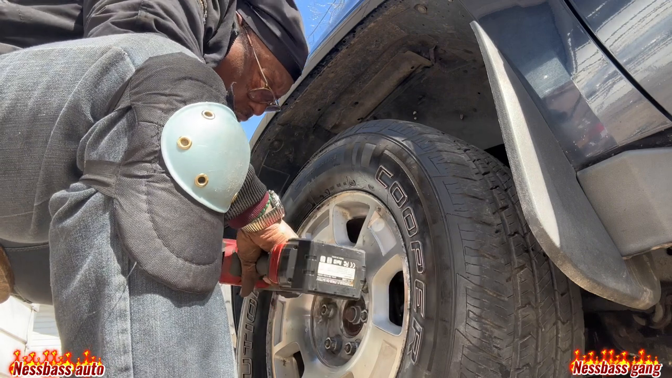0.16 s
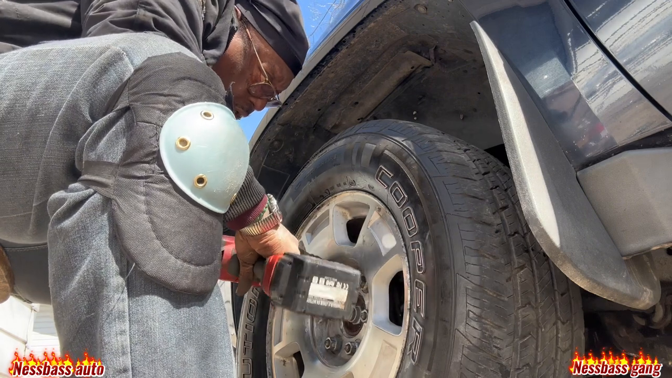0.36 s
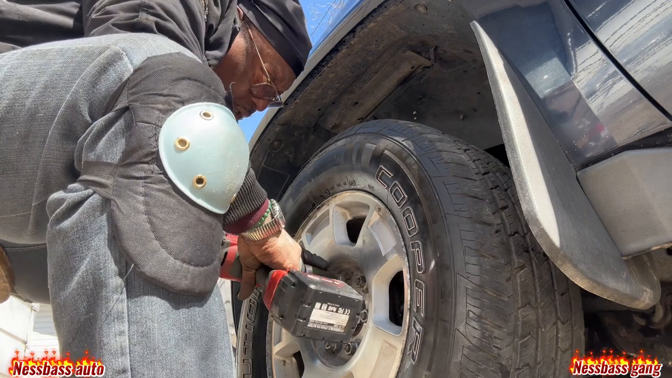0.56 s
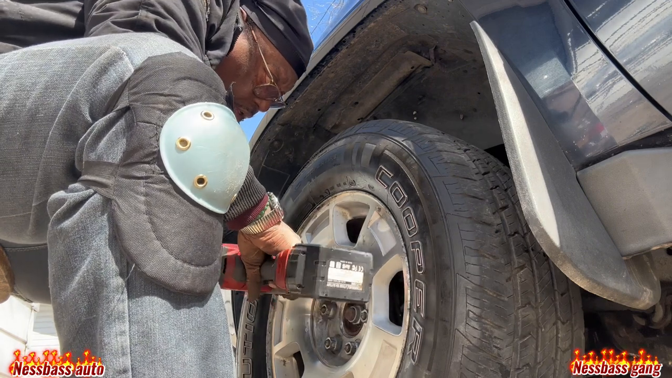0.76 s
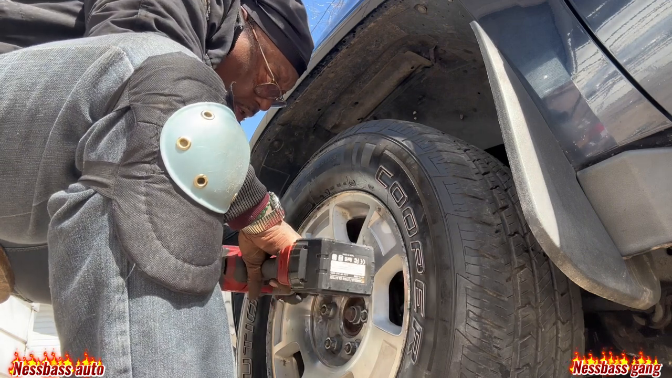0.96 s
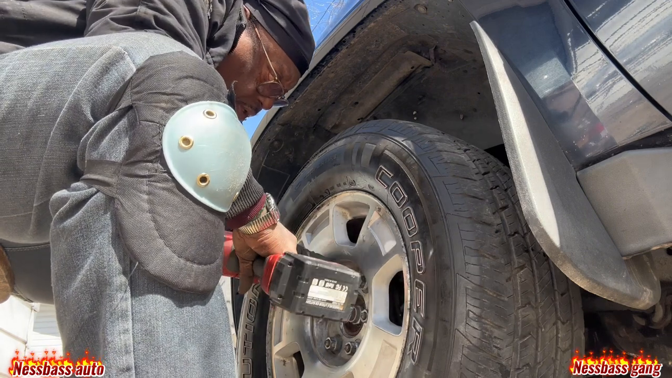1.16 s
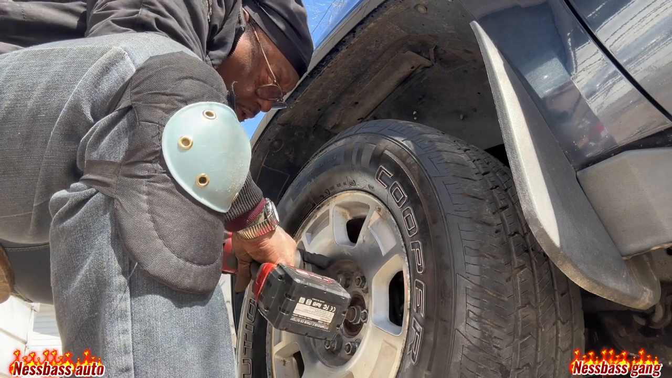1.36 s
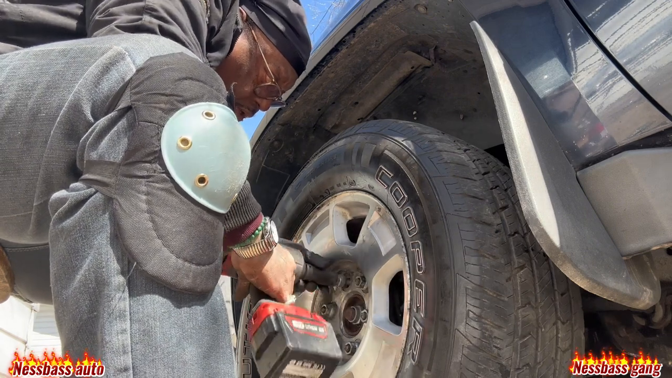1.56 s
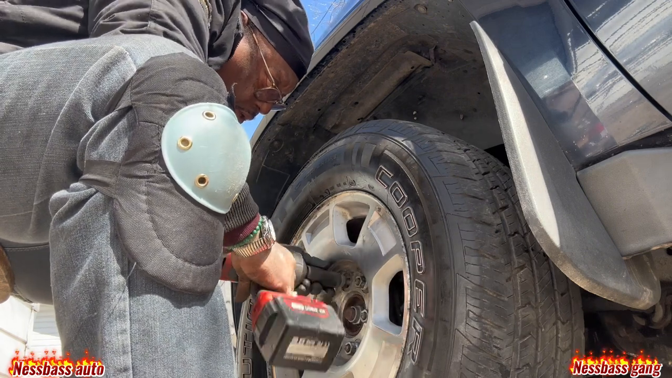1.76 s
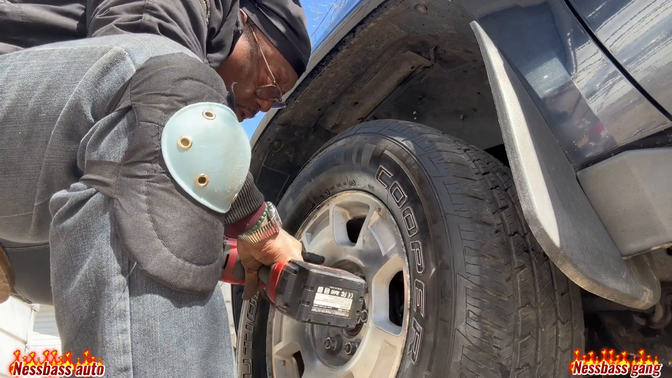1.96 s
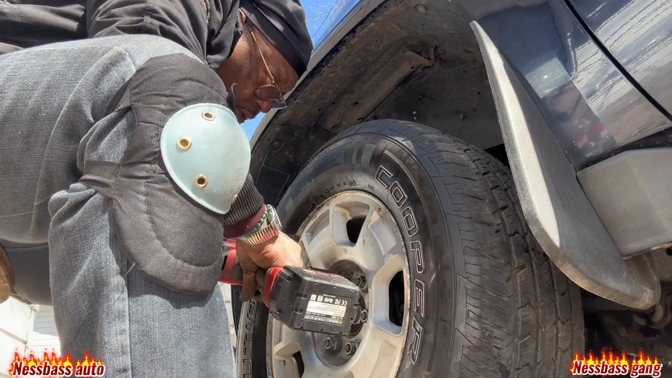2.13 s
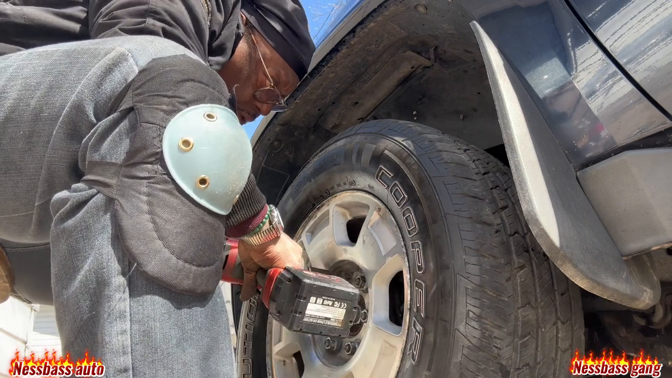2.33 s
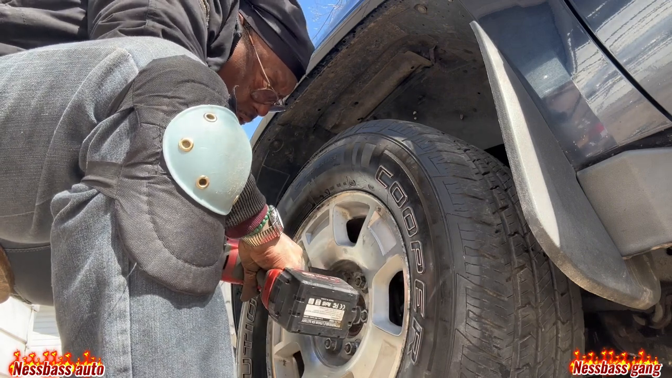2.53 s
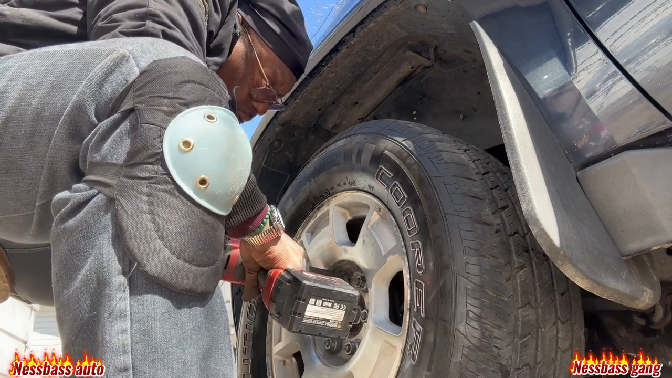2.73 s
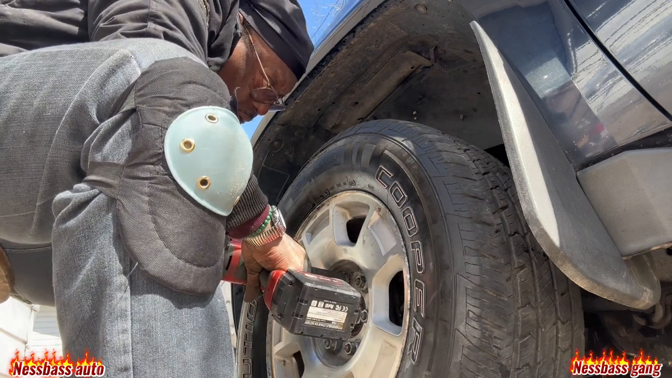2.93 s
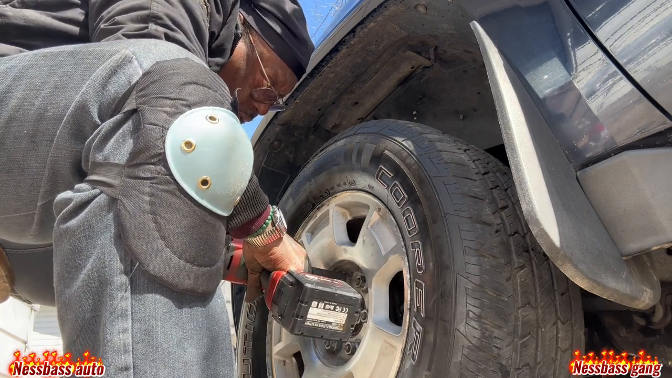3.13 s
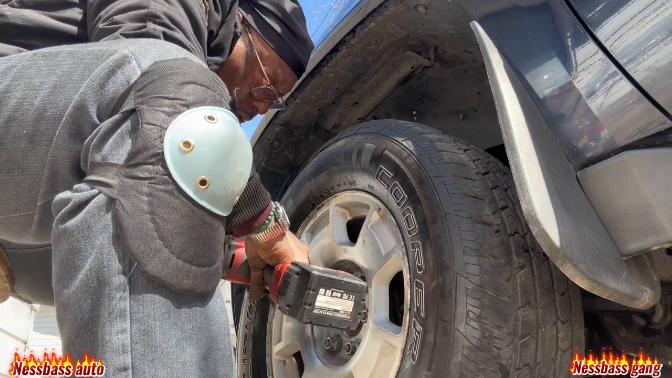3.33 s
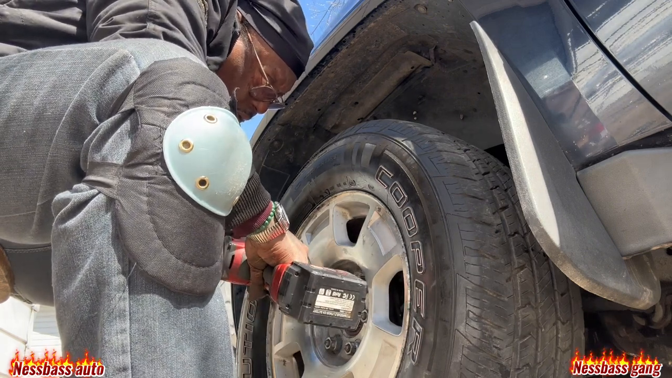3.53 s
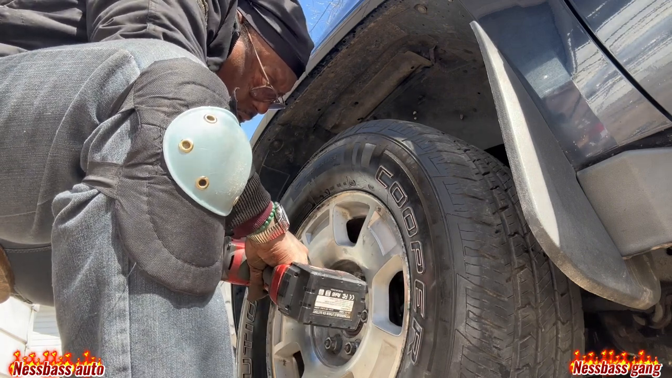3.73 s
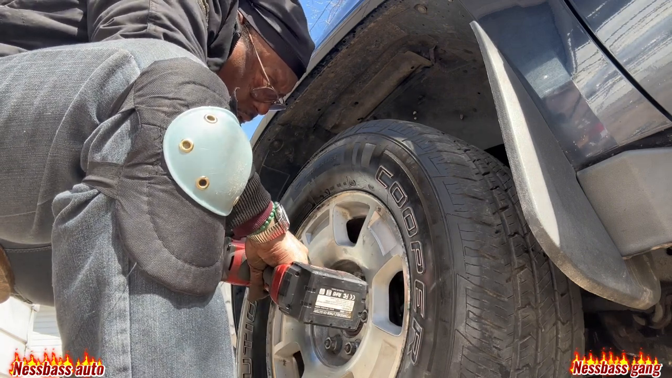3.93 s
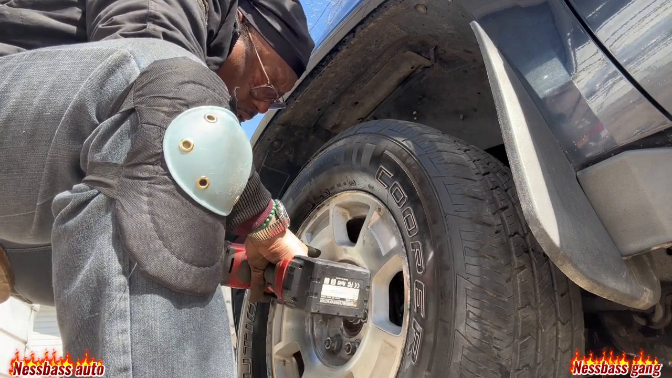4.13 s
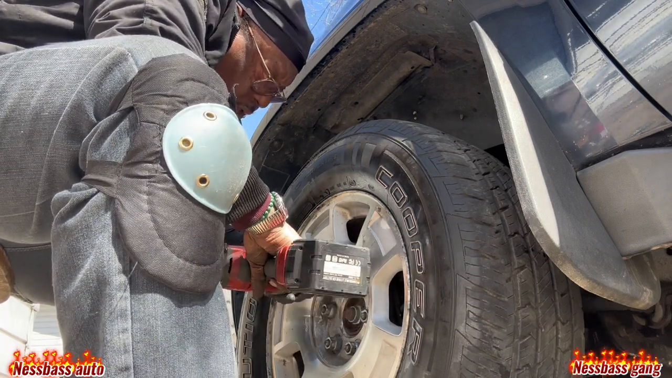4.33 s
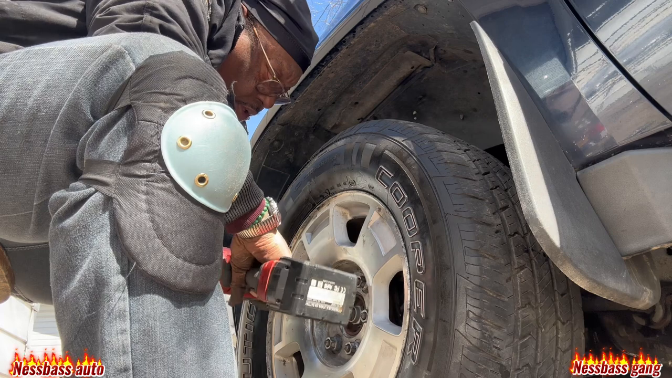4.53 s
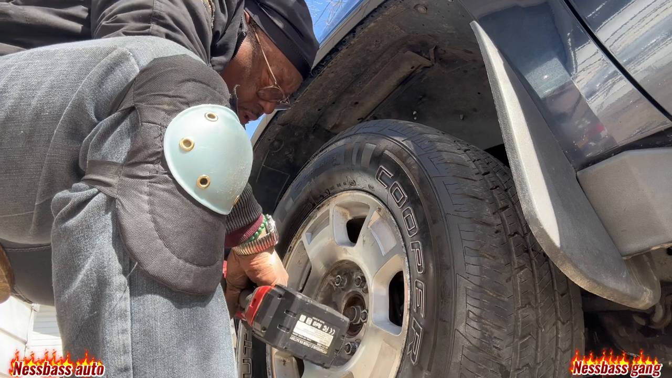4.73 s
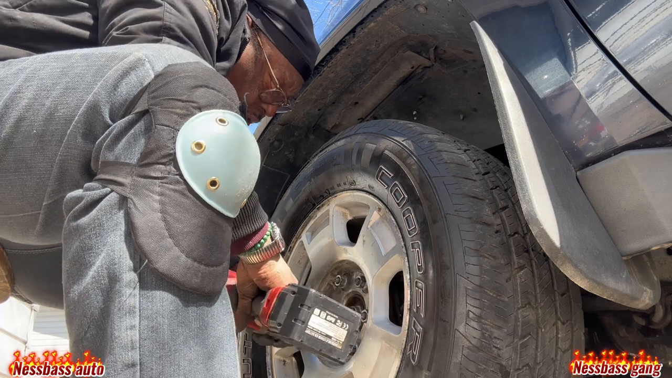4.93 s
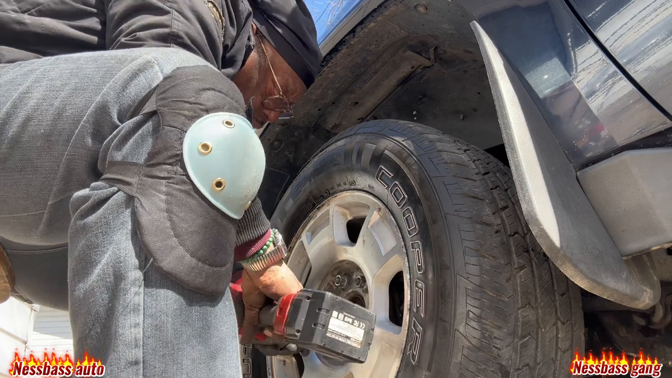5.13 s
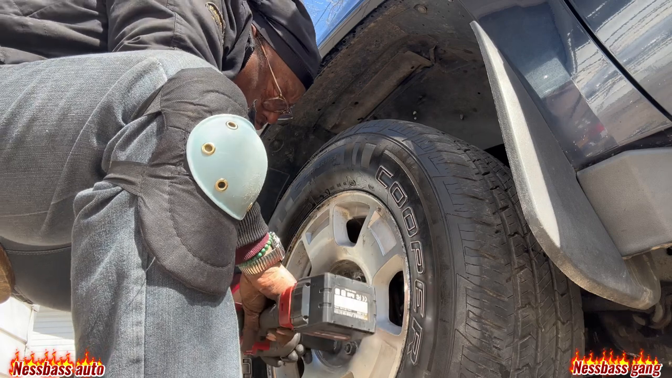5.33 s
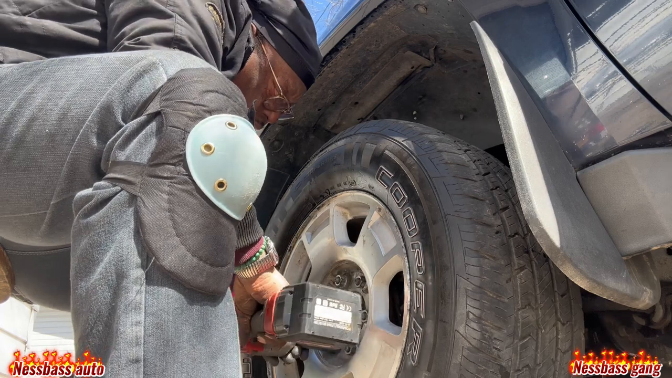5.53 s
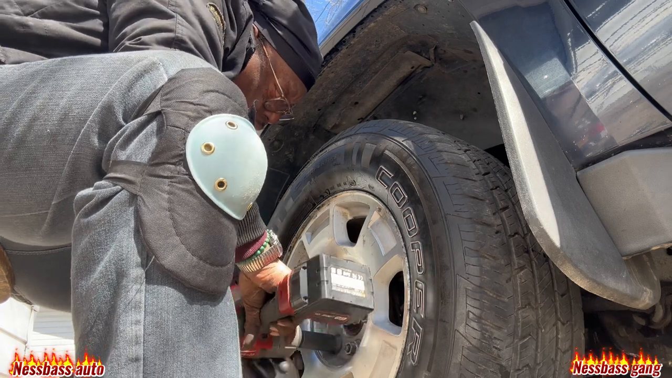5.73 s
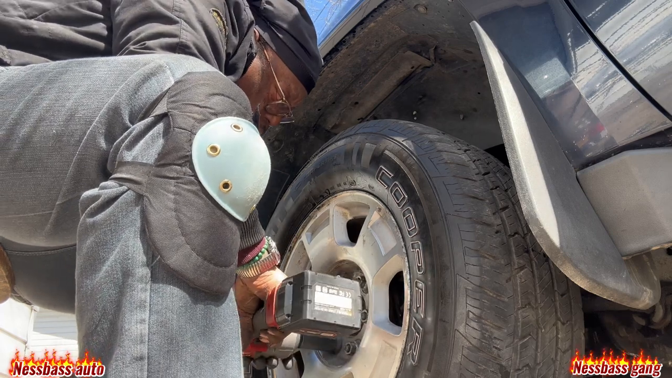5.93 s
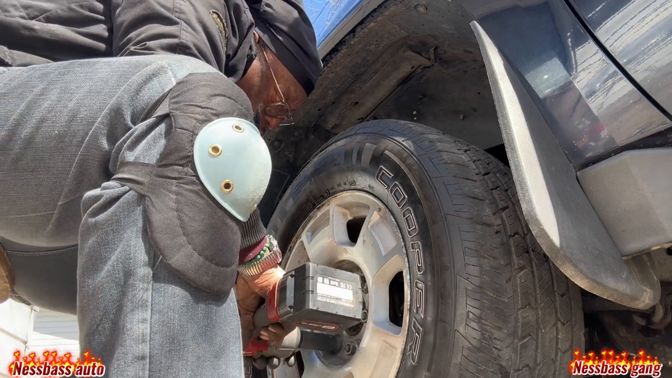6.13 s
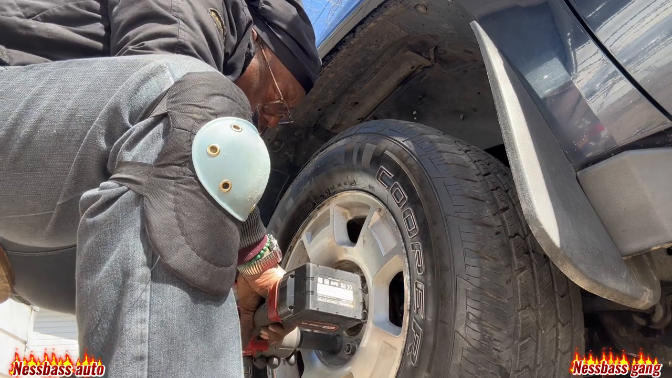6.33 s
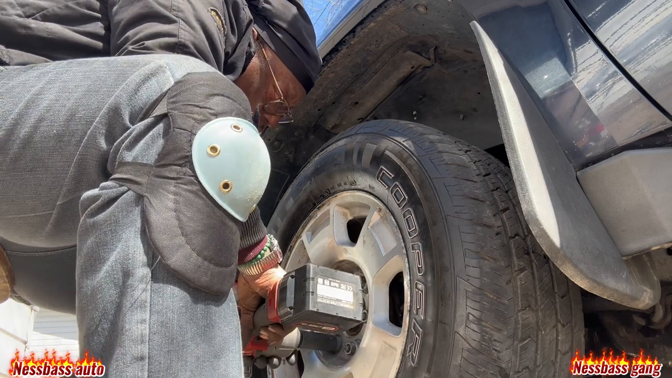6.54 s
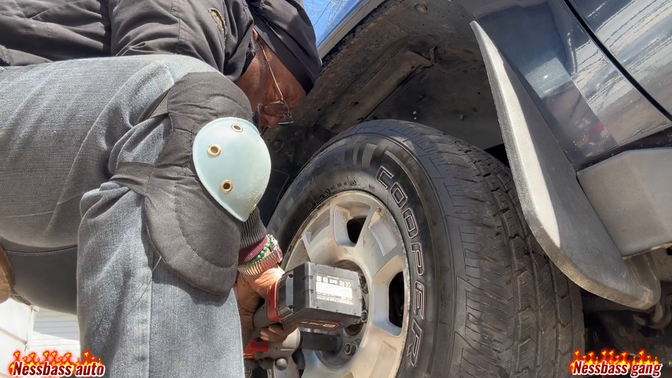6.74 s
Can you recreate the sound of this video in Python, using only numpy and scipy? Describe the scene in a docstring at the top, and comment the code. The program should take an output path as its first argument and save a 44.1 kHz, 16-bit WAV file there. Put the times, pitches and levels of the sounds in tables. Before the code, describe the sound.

A cordless impact wrench whirs up and hammers wheel nuts in two loud rattling bursts, with light socket knocks between, outdoors in faint wind.

```python
"""A cordless impact wrench works two wheel nuts on a driveway, an arm's length from a phone on the ground.
Its hammer strikes the anvil and rebounds: noise bursts excite ringing modes of socket, wheel and tyre.
The drive electronics whine as sines around their switching tone; gears whirr as shaped noise.
Between bursts the socket knocks on the studs, under noise shaped as wind, far traffic and rustling cloth."""
import sys
import numpy as np
from scipy import signal
from scipy.fft import rfft, irfft, next_fast_len
from scipy.io import wavfile
from scipy.ndimage import uniform_filter1d

SR = 44100
rng = np.random.default_rng(int(sys.argv[2]) if len(sys.argv) > 2 else 0)


def unload_audio(sound):
    """Save the sound as a 16-bit wav file, at the path given as the first command line argument."""
    columns = np.transpose(np.atleast_2d(sound))
    # keep every value between -1 and 1, then stretch to whole-number steps
    steps = np.round(np.clip(columns, -1, 1) * 32767)
    wavfile.write(sys.argv[1], SR, steps.astype(np.int16))


N = 299439
T = np.arange(N) / SR
SIZE = next_fast_len(N + SR // 8)  # padded transform length
HZ = np.maximum(np.arange(SIZE // 2 + 1) * SR / SIZE, 1)  # frequency of each bin


def undb(db):
    """Decibels to gain."""
    return np.exp(np.asarray(db) * np.log(10) / 20)


def over_hz(table):
    """A (frequency, value) table read at every bin, straight between points on a log-frequency axis."""
    hz, value = np.transpose(table)
    return np.interp(np.log(HZ), np.log(hz), value)


def shape(x, gain):
    """Filter with one gain a bin; white noise keeps its power, so only the shape of the gain counts."""
    gain_rms = np.sqrt(np.mean(np.abs(gain) ** 2))
    return irfft(rfft(x, SIZE) * gain / gain_rms, SIZE)[..., :N]


def hiss():
    """Two unrelated white noises."""
    return rng.standard_normal((2, N))


def walk(rate):
    """Random levels held 1 / rate seconds and smoothed twice into a slow wander."""
    hold = int(SR / rate)
    steps = np.repeat(rng.standard_normal(N // hold + 1), hold)
    return uniform_filter1d(uniform_filter1d(steps, hold), hold)[:N]


def ring(x, hz, db, t60):
    """One decaying mode: a two-pole resonator that falls 60 dB in t60 seconds."""
    radius = 1000. ** (-1 / (t60 * SR))
    angle = 2 * np.pi * hz / SR
    return undb(db) * signal.lfilter([0, np.sin(angle)], [1, -2 * radius * np.cos(angle), radius ** 2], x)


def push(s, db, rise, fall):
    """Contact envelopes at times s: power rises and falls with the two time constants, peak near db."""
    power = np.zeros(N)
    np.add.at(power, (s * SR).astype(int), undb(2 * db))
    for tau in (rise, fall):
        power = signal.lfilter([1], [1, -np.exp(-1 / (tau * SR))], power)
    return np.sqrt(power / (min(rise, fall) * SR))


def taps(s, db):
    """One impulse at each time s, in the part that both ports share."""
    out = np.zeros((2, N))
    inside = s < T[-1]
    out[0, (s[inside] * SR).astype(int)] = undb(db[inside])
    return out


def well_separated(s, apart_s):
    """True for hits more than apart_s after the last one marked true."""
    separate, last = np.zeros(len(s), bool), -1
    for i, t in enumerate(s):
        if t - last > apart_s:
            separate[i], last = True, t
    return separate


def blows():
    """The hammer strikes, rebounds once a stroke, and drive slack clacks: rows of strikes() in time order."""
    # hammer strokes: start_s, crack_db, wheel_ring_db above the crack, rebound_after_s, rebound_crack_db
    strokes = [(3.1811, -12.5, 3, 0.016, -16), (3.2465, -10.5, -4, .0208, -15),
               (3.3155, -7.5, -6.5, .0219, -14.5), (3.3863, -8.5, -6, .019, -12.5),
               (3.4521, -10, -4, .0202, -11.5), (3.521, -10, -3.5, .0209, -12),
               (3.5886, -8, -6, .0216, -10.5), (3.6566, -12.5, -11, .0208, -11.5),
               (3.7255, -10.5, -6, 0.025, -15), (3.7922, -12, -3.5, .0193, -12),
               (3.86, -10, 0, .0192, -14.5), (3.9308, -10, -4, 0.013, -14), (3.9978, -10, 0, .0162, -17.5),
               (4.0634, -12, -0.5, .0166, -13), (4.1326, -14, -3.5, .015, -12.5),
               (4.2004, -13, -16, .0199, -11.5), (6.0567, -12.5, 0.5, .021, -12),
               (6.1297, -13, 5, .0186, -18), (6.1972, -11, -3, .0173, -17.5),
               (6.2631, -13, -3.5, .0187, -13), (6.332, -13.5, -6, .0187, -14.5),
               (6.4006, -14, -5, .0163, -13.5), (6.4668, -12.5, 1, .0199, -15),
               (6.5358, -12.5, -6, .0146, -12.5), (6.6011, -13, -4, .0162, -10.5),
               (6.6699, -13, -2, .0148, -14), (6.7356, -12.5, -13, .0172, -9.5)]
    # slack clacks as it takes up and between strokes while the nut still turns:
    # start_s, crack_db, treble_db above the crack
    clacks = [(2.145, -33, -5), (2.2018, -14.5, -31.5), (3.173, -16.5, -7), (3.225, -13.5, -13.5),
              (3.2934, -16.5, -10.5), (3.356, -16.5, -8.5), (3.368, -12, -10.5), (3.4296, -18.5, -2),
              (3.501, -17, -5.5), (3.6365, -21.5, -1.5), (3.77, -20, -10.5), (6.0483, -13.5, -10),
              (6.1054, -20, -11)]
    s, db, wheel_db, after, rebound_db = np.transpose(strokes)
    # treble above the crack, scattered from hit to hit
    scatter_db = 3.5 * rng.standard_normal((2, len(s)))
    struck = np.transpose([s, db, wheel_db, -8 + scatter_db[0]])
    rebounds = np.transpose([s + after, rebound_db, wheel_db + 0.5, -14 + scatter_db[1]])
    slack = [(t, crack_db, -9.5, treble_db) for t, crack_db, treble_db in clacks]
    rows = np.concatenate([struck, rebounds, slack])
    return rows[np.argsort(rows[:, 0])]


def strikes(rows, split_hz, fall, wash, tail_db, dull, thump_db, windup_db, late):
    """Steel on steel: tick and rattling crack, wheel-arch wash, wheel and tyre; also the bare low contact.

    Row columns: start_s, crack_db, wheel_ring_db and treble_db, the last two above the crack.
    """
    # overall crack spectrum as heard: frequency_hz, relative_db
    crack_spectrum = [(180, -36.5), (300, -15), (640, -10), (797, -4), (912, -13.5), (1080, -11.5),
                      (1410, -17.5), (2630, -10), (6650, -14.5), (7610, -17.5), (9160, -17), (10300, -24.5),
                      (11800, -22.5), (15700, -26.5), (16800, -53.5)]
    s, crack_db, wheel_db, treble_db = np.transpose(rows)
    separate = well_separated(s, apart_s=.055)
    upper = 1 / (1 + (split_hz / HZ) ** 8)
    spectrum = undb(over_hz(crack_spectrum))

    # a tick, then loose parts chatter, so the crack is a cluster of tiny contacts
    chatter = undb(4 * walk(1000))
    low_tick = push(s, crack_db - 8.5, 0.0002, 0.00064)
    low_rattle = chatter * push(s - .001, crack_db - 8.0, 0.0027, fall)
    low = (low_tick + low_rattle) * hiss()
    high_db = crack_db + treble_db
    high_tick = push(s, high_db + 3.5, 0.00023, .0008)
    high_rattle = chatter * push(s - .001, high_db - 3.5, 0.0027, 0.73 * fall)
    high = (high_tick + high_rattle) * hiss()
    crack = shape(low, spectrum * (1 - upper)) + shape(high, spectrum * upper)

    # the cam grinds as it lifts the hammer ahead of a hit
    windup = push(s[separate] - .016, crack_db[separate] + windup_db, .006, 0.0045)
    windup = windup + push(s - .004, crack_db + windup_db + 7.0, 0.0027, 0.003)
    arch_level = push(s, crack_db + tail_db, 0.0024, wash) + windup
    arch = shape(arch_level * hiss(), spectrum * (1 + (HZ / 1500) ** 2) ** (-dull / 2))
    # a fainter, duller and longer tail
    yard = shape(push(s + .01, crack_db - 37, .01, 0.049) * hiss(), spectrum / (1 + (HZ / 4000) ** 2))

    ringing = wheel_ring(s, crack_db + wheel_db, separate)
    thud = tyre(s[separate], crack_db[separate] + thump_db, late)
    return crack + arch + yard + ringing + thud, low


def wheel_ring(s, db, separate):
    """The wheel is struck and, after well separated hits, rocks back on the hub; blow and shake ring it."""
    # wheel modes: frequency_hz, relative_db, t60_s
    wheel_modes = [(330, -9, 0.081), (526.4, -2, 0.084), (586, -1, 0.049), (693, 1.5, 0.085),
                   (816, 6, 0.053), (965, -0.5, 0.029), (1085.6, -3, 0.12)]
    shake = push(s + 0.0027, db - 33.5, 0.00078, 0.0022)
    shake = shake + push(s[separate] + 0.013, db[separate] - 30.0, 0.0023, 0.0023)
    blow = uniform_filter1d(taps(s + 0.00217, db - 15.0), size=9)
    return sum(ring(blow + shake * hiss(), *mode) for mode in wheel_modes)


def tyre(s, db, late):
    """Tyre and suspension: low modes swell and fade, the same way after each well separated hit."""
    # tyre modes: frequency_hz, relative_db, swell_s, delay_s before the factor late
    tyre_modes = [(99.5, 0, 0.0086, .047), (97, -12.5, 0.0069, .008), (150.4, -5, 0.0095, .009),
                  (265, -5.5, 0.0061, 0.0048), (254.8, -0.5, .009, 0.0184)]
    out = 0
    for hz, mode_db, swell, delay in tyre_modes:
        t60 = swell * np.log(1000)
        once = ring(taps(s + late * delay, db), hz, mode_db, t60)
        # the same resonance twice in a row swells before it fades
        out = out + ring(once, hz, 0, t60) * 2 * np.e / (swell * SR)
    return out


def tool_ring(contact):
    """The hammer rings anvil and socket; strokes land differently, so the anvil's modes change balance."""
    # short anvil modes: frequency_hz, relative_db, t60_s
    anvil_modes = [(2037, -29, 0.023), (2810, -30, 0.021), (3430, -29.5, 0.016), (3900, -26.5, 0.0068),
                   (4720, -20.5, 0.0065), (5400, -21.5, 0.0082), (5850, -24.5, 0.0094), (7470, -22, 0.0081)]
    # longer socket modes: frequency_hz, relative_db, t60_s
    socket_modes = [(1700, -53, .2), (2557, -50, .2), (3020, -49, .36), (3356, -50, .25), (3451, -53, .3),
                    (3521, -51, .4), (3549, -54, .35), (4237, -53, .3), (4420, -55, .3), (4554, -55, .4)]
    anvil = sum(ring(contact * undb(4 * walk(30)), *mode) for mode in anvil_modes)
    return anvil + sum(ring(contact, *mode) for mode in socket_modes)


def hammering():
    """The wrench's blows on wheel and tyre, with the ring of the tool itself."""
    hammer, contact = strikes(blows(), split_hz=5500, fall=0.0035, wash=0.014, tail_db=-14.0, dull=0.5,
                              thump_db=-14.5, windup_db=-21.5, late=0.931)
    return hammer + tool_ring(contact)


def past(s, switch_s=0.029):
    """A ramp from 0 at time s to 1 switch_s later."""
    return np.clip((T - s) / switch_s, 0, 1)


def trigger():
    """Field speed and the gains of whine and whirr: spin up, run free, labour under the hammer, brake."""
    # trigger pulls: pulled_s, hammering_from_s, released_s, then gains while hammering: whine_db, whirr_db
    pulls = [(2.114, 3.169, 4.24, -11.5, -35), (5.968, 6.041, 6.9, -8, -41)]
    free_hz, loaded_hz, brake_s = 411.2, 400, .05  # field rotation; time constant of its braking
    spin_up_s, spin_up_power = .075, 1.6  # a quick run-up,
    creep_share, creep_s = .15, .1  # then a slow creep to full speed
    whine_free_db, whirr_free_db = 2, -35
    whine_db_per_decade, whirr_db_per_decade = 15, 17  # of speed
    pull_away_db, whine_start_db = 2.5, -10  # louder whine while it gains speed; its least free-running gain
    surge_db, surge_s = 12, 0.26  # the gears roar as the load comes on
    slack_s = 0.013  # the gears start late
    coast_whine_db, coast_whirr_db = -28, -54.5  # after release
    brake_whine_db, brake_from_s, silent_after_s = -13, 0.041, 0.11  # times after release
    hz, whine, whirr = 0, 0, 0
    for pulled, loaded, released, work_whine_db, work_whirr_db in pulls:
        since = np.maximum(T - pulled, 0)
        creep = np.exp(-since / creep_s)
        run_up = (1 - creep_share) * np.exp(-(since / spin_up_s) ** spin_up_power)
        spin = 1 - run_up - creep_share * creep
        spin = spin * np.exp(-np.maximum(T - released, 0) / brake_s)
        hz = hz + spin * (free_hz + (loaded_hz - free_hz) * past(loaded))
        decades = np.log10(spin + 1e-3)

        # crossfades between the states of the drive
        free, work, coast = 1 - past(loaded), past(loaded) - past(released), past(released)
        brake = past(released + brake_from_s)
        on = past(pulled - 0.0145) - past(released + silent_after_s)

        run_db = whine_free_db + whine_db_per_decade * decades + pull_away_db * creep
        whine_db = free * np.maximum(run_db, whine_start_db) + work * work_whine_db
        whine_db = whine_db + (coast - brake) * coast_whine_db + brake * brake_whine_db
        whine = whine + on * undb(whine_db)

        roar_db = surge_db * np.exp(-np.maximum(T - loaded, 0) / surge_s)
        whirr_db = free * whirr_free_db + work * (work_whirr_db + roar_db) + coast * coast_whirr_db
        whirr_db = whirr_db + whirr_db_per_decade * decades
        whirr = whirr + on * past(pulled + slack_s) * undb(whirr_db)
    return hz, whine, whirr


def electronics_whine(field, speed):
    """Switching tone with sidebands that fan out as the field speeds up, heard at left and right."""
    switch_hz = 7811
    # whine lines at m x switching tone + k x field rotation: m, k
    line_orders = [(0, 2), (0, 5), (0, 6), (0, 7), (1, -6), (1, -5), (1, -4), (1, -2), (1, -1), (1, 0),
                   (1, 1), (1, 2), (1, 3), (1, 4), (2, -1), (2, 0)]
    # the same lines, before speed and trigger gain: rms_db, left_minus_right_db, left_leads_rad
    line_levels = [(-57, 3, .3), (-51, 2, 1), (-47, 1.5, 2.4), (-45.5, 1, -.6), (-57.5, 3.5, .3),
                   (-54, 2, -.2), (-57, 4, -2.4), (-52.5, 3.5, .9), (-46.5, 10.5, -.8), (-52, 1.5, 0),
                   (-50.5, .5, 0), (-54.5, 0, 0), (-61, 0, 0), (-63, 0, 0), (-64, -.5, 1.8),
                   (-60, -.5, 1.6)]
    whine = 0
    for (m, k), (db, pan_db, lead) in zip(line_orders, line_levels):
        # far sidebands need speed; every line wavers on its own
        waver_db = 3 * walk(22) + 2.3 * walk(6)
        size = np.sqrt(2) * undb(db + waver_db) * speed ** (0.23 * abs(k))
        phase = m * 2 * np.pi * switch_hz * T + k * field + 2 * np.pi * rng.random()
        phase = phase + np.array([[lead], [0]])
        whine = whine + size * np.sin(phase) * undb([[pan_db / 2], [-pan_db / 2]])
    return whine


def gear_whirr(field, speed):
    """Gears and fan whirr: flickering noise, stronger in some bands, with motor tones that follow the field."""
    # overall whirr spectrum as heard, bands aside: frequency_hz, relative_db
    whirr_spectrum = [(59, -23), (100, 1), (642, -10), (2800, -8), (3540, -13), (5920, -12), (6580, -17.5),
                      (7650, -15.5), (8880, -17.5), (10100, -42), (11500, -18.5), (13600, -39.5),
                      (14500, -49.5), (15500, -15.5), (16500, -42.5)]
    # bands of whirr around the motor and gear tones: frequency_hz, half_width_hz, relative_db
    whirr_bands = [(827, 60, -16.5), (950, 34, -17), (1865, 46, -12), (2890, 43, -11), (4350, 580, -15)]
    # motor tones: multiple of field rotation, amplitude_db above the whirr
    motor_tones = [(1, -20), (2.3, -22), (4.55, -14.5), (10, -23.5), (10.72, -24), (12.01, -22)]
    bands = 1 + sum(undb(db + 14.0) / (1 + ((HZ - hz) / width) ** 2) for hz, width, db in whirr_bands)
    teeth = hiss() * undb(2.5 * walk(400) + 1.3 * walk(30))
    whirr = shape(teeth, undb(over_hz(whirr_spectrum)) * bands)
    # the tones waver in level and go into the part that both ports share
    whirr[0] += sum(undb(db + 6.7 * walk(30)) * np.sin(k * field) for k, db in motor_tones)
    # at low speed the rotor cogs and shakes the housing at its own pitch
    cogging = shape(hiss(), 1 / (1 + ((HZ - 2950) / 280) ** 2)) * undb(9.0) * np.clip(1 - speed, 0, 1)
    return whirr + cogging


def motor():
    """One rotating field drives both the whine of the electronics and the whirr of the gears."""
    hz, whine_gain, whirr_gain = trigger()
    speed = hz / 425.0
    field = 2 * np.pi * np.cumsum(hz * (1 + .0012 * walk(25))) / SR  # radians, slightly unsteady
    return electronics_whine(field, speed) * whine_gain, gear_whirr(field, speed) * whirr_gain


def handling():
    """Socket and tool touch studs and rim; a hand on the socket keeps light knocks from ringing the tool."""
    # knocks: start_s, crack_db, wheel_ring_db and treble_db, the last two above the crack
    knocks = [(0.1461, -45, -24, -5), (0.7253, -49, -11, -23), (0.7642, -50, -8, -12),
              (0.852, -57, -3, -20), (1.0984, -43.5, -8, -23), (1.1144, -45.5, -10, -23),
              (1.2416, -34.5, 1, -33), (1.286, -43.5, 12.5, -24), (1.3094, -51.5, 8.5, -18),
              (1.712, -51.5, 4, -7), (1.7702, -40, 0, -30.5), (1.7894, -43, -4, -21), (1.856, -50, -8, -16),
              (1.881, -51, -8, -21), (2.0882, -49, -2, -1), (4.3311, -45.5, -0.5, -1),
              (4.9728, -52.5, -3, -22), (5.0195, -41.5, -8, -20), (5.055, -46, 6, -21),
              (5.069, -35, 3, -35), (5.362, -42, 5, -21), (5.3792, -37, 1.5, -16), (5.7104, -51, 6.5, -16),
              (5.7423, -48.5, -7, -10), (5.8107, -42, -18, -23), (5.8631, -50.5, -10, -6),
              (5.889, -48, -11, -6.5), (5.9743, -51, -3, -5), (5.9878, -39.5, 4, -14)]
    sound, _ = strikes(knocks, split_hz=3340, fall=0.0073, wash=0.007, tail_db=-6.5, dull=1.0,
                       thump_db=-8, windup_db=-53, late=0)
    return sound


def brushes():
    """Brief brushes of cloth: bright flickering noise that swells and fades."""
    # brushes: middle_s, length_s, level_db
    brush_times = [(0.502, .06, -69), (.555, .08, -65.5), (1.013, .08, -65), (1.854, 0.095, -68),
                   (1.98, .08, -69), (2.09, 0.12, -63), (4.71, .08, -77), (5.36, 0.12, -67),
                   (5.74, 0.19, -64.5)]
    # overall brush spectrum as heard: frequency_hz, relative_db
    brush_spectrum = [(2500, -24), (5000, 0), (8000, 2), (10300, -12), (12500, 0), (14500, -12),
                      (16500, -30)]
    level = sum(undb(db) * np.cos(np.pi * np.clip((T - s) / length, -.5, .5))
                for s, length, db in brush_times)
    return shape(hiss() * undb(2.0 * walk(200)), undb(over_hz(brush_spectrum))) * level


def sleeve(level_db):
    """A sleeve rustles now and then: treble noise with quick and slow wavering."""
    # rustle spectrum: frequency_hz, relative_db
    rustle_spectrum = [(1500, -26.5), (3000, -7), (5000, 8.5), (9000, 5), (13000, -12), (16500, -25.5)]
    rustle = shape(hiss() * undb(1.0 * walk(240)), undb(over_hz(rustle_spectrum)))
    return rustle * undb(level_db + 3.6 * walk(5.5))


def wind(level_db):
    """Wind rumbles on the ports: gusting bass noise, partly shared between them."""
    # wind spectrum: frequency_hz, relative_db
    wind_spectrum = [(12, -45.5), (20, -20.5), (36, -4.5), (81, 2.5), (140, -4), (160, -11), (344, -22),
                     (400, -22.5), (520, -38.5), (880, -120)]
    a, b = hiss()
    rumble = shape([a + 0.52 * b, a - 0.34 * b], undb(over_hz(wind_spectrum)))
    return rumble * undb(level_db + 3.0 * walk(12))


def traffic(level_db):
    """Far traffic hums: low noise that drifts slowly, nearly unrelated left and right."""
    # traffic spectrum: frequency_hz, relative_db
    traffic_spectrum = [(88, -23.5), (150, -3), (230, -6.5), (299, -9.5), (538, -13), (587, -15.5),
                        (5000, -40), (6500, -69.5), (11000, -120)]
    a, b = hiss()
    hum = shape([a + 0.96 * b, a - 0.89 * b], undb(over_hz(traffic_spectrum)))
    return hum * undb(level_db + 0.82 * walk(3.7))


def outdoors():
    """Cloth, wind and far traffic; brushes come at set times, the others follow levels through time."""
    # background levels: time_s, wind_db, traffic_db, sleeve_rustle_db
    air_levels = [(0, -52.5, -57.5, -83.5), (.6, -49.5, -54, -74), (1.1, -53, -54, -82),
                  (1.22, -44.5, -52.5, -79), (1.48, -49.5, -52.5, -70.5), (1.62, -44.5, -52, -71),
                  (1.72, -49.5, -49, -71), (1.82, -42.5, -49.5, -75), (2.1, -45, -51.5, -69),
                  (3, -44, -49, -70), (4.45, -49.5, -59, -78), (4.75, -55, -60, -84),
                  (5.15, -49.5, -56, -82), (5.3, -46, -53.5, -80), (5.55, -45.5, -52, -71),
                  (5.78, -44, -52, -71), (5.93, -45.5, -53.5, -72)]
    s, *columns = np.transpose(air_levels)
    wind_db, traffic_db, rustle_db = (np.interp(T, s, column) for column in columns)
    return brushes() + sleeve(rustle_db) + wind(wind_db) + traffic(traffic_db)


def ports(pair):
    """Two microphone ports: likeness, level and phase differ by frequency; pair is a shared and a side part."""
    # likeness of the ports: frequency_hz, left_right_correlation
    likeness = [(60, 0.92), (150, 0.8), (300, 0.67), (800, 0.075), (1200, 0.67), (2500, 0.19),
                (4000, 0.098), (6500, 0.17), (8000, 0.97), (14500, 0.8), (16000, .5)]
    # level difference: frequency_hz, left_minus_right_db
    left_level = [(60, 0), (125, -1), (250, 1), (600, 3.5), (1200, 1.5), (2400, 2), (5000, 3.5),
                  (9000, 1.4), (14000, -0.5)]
    # phase difference: frequency_hz, left_leads_rad
    left_lead = [(60, 0), (700, .8), (1100, .1), (2000, 1.2), (2500, 2.3), (4000, 2.9), (6500, 2.2),
                 (7500, .4), (8300, 0), (10300, -3.1), (12000, -6.2), (13000, -6.5), (14500, -9.4),
                 (15500, -11)]
    shared, unlike = rfft(pair, SIZE)
    alike = np.clip(over_hz(likeness), 0, 1)
    mid = np.sqrt((1 + alike) / 2) * shared
    side = np.sqrt((1 - alike) / 2) * unlike
    # half of each difference goes to the left, its inverse to the right
    left = undb(over_hz(left_level) / 2) * np.exp(.5j * over_hz(left_lead))
    return irfft([(mid + side) * left, (mid - side) / left], SIZE)[:, :N]


def scene():
    """Hammer, knocks and gears at the wheel reach the two ports; whine and air have their own stereo."""
    whine, whirr = motor()
    return ports(hammering() + handling() + whirr) + whine + outdoors()


def record(dry):
    """The phone drops the deepest bass, rounds the loudest peaks and cuts the top."""
    top_hz = 16700
    steady = signal.sosfilt(signal.butter(3, 34, "high", fs=SR, output="sos"), dry)
    rounded = steady / (1 + (steady / .92) ** 4) ** .25
    return signal.sosfilt(signal.ellip(10, .2, 90, top_hz, fs=SR, output="sos"), rounded)


dry = scene()
out = record(dry)
unload_audio(out)
```